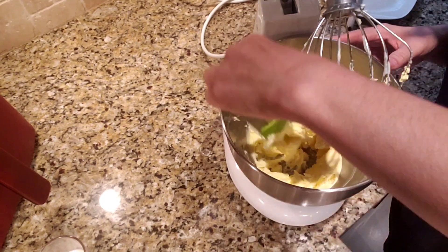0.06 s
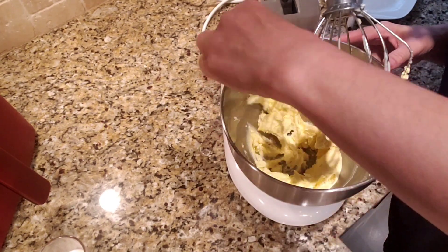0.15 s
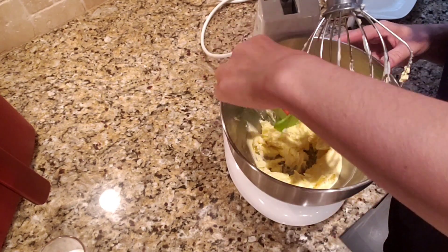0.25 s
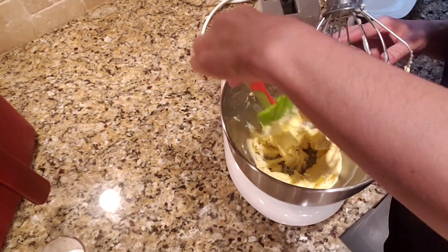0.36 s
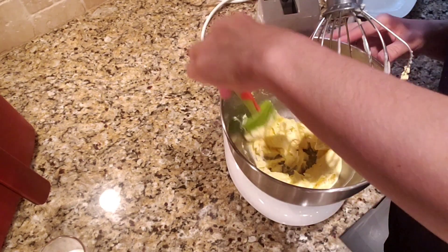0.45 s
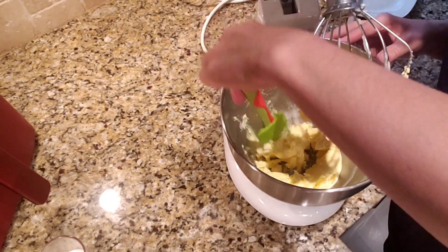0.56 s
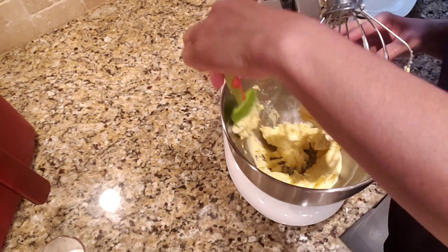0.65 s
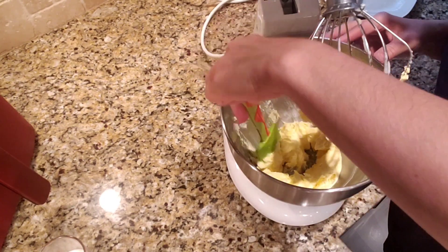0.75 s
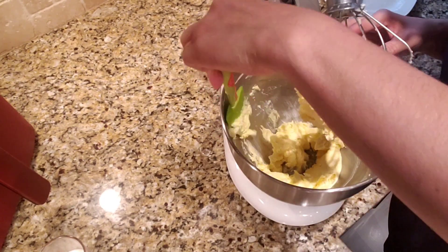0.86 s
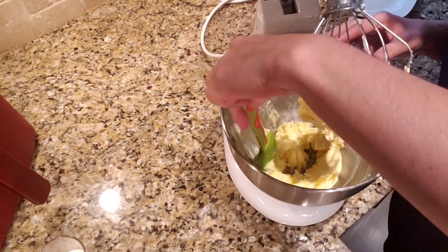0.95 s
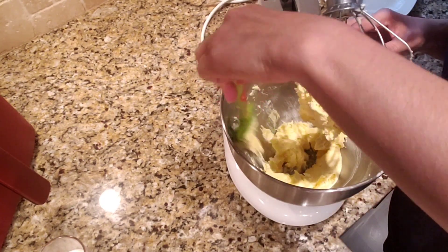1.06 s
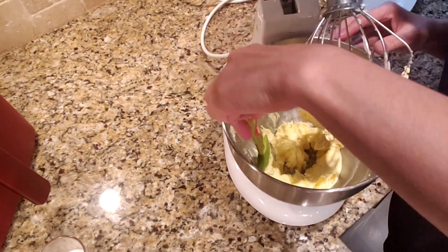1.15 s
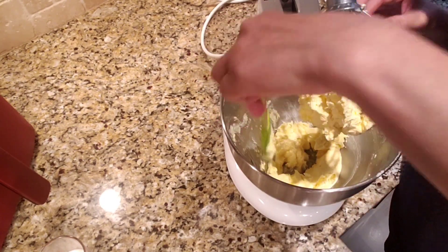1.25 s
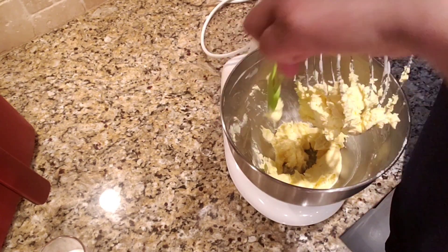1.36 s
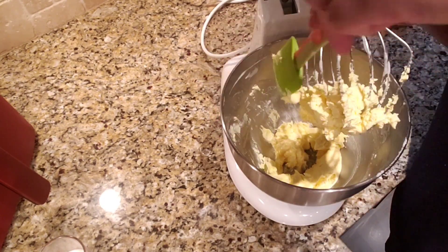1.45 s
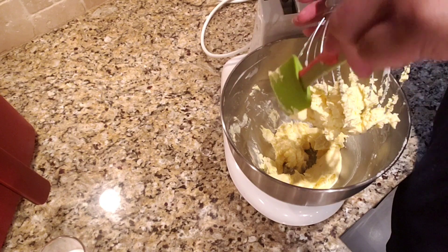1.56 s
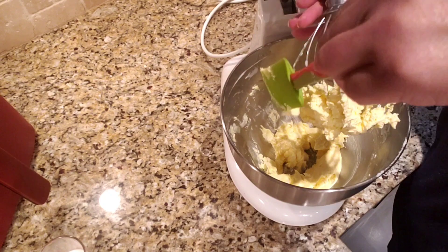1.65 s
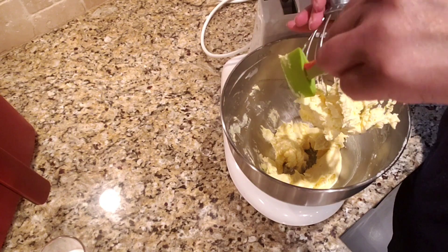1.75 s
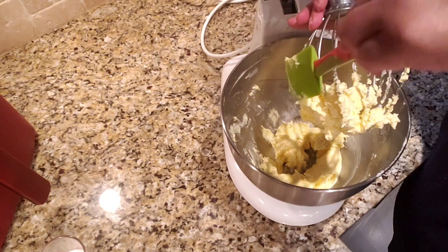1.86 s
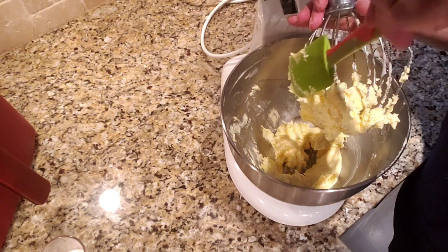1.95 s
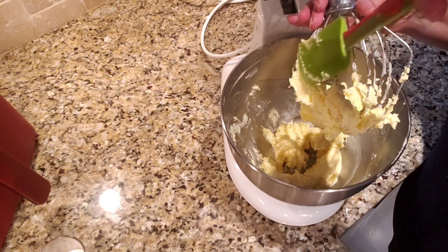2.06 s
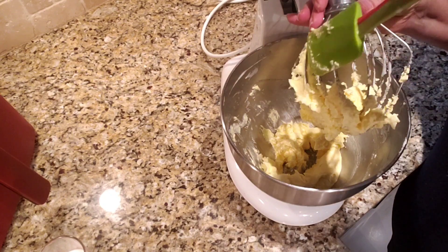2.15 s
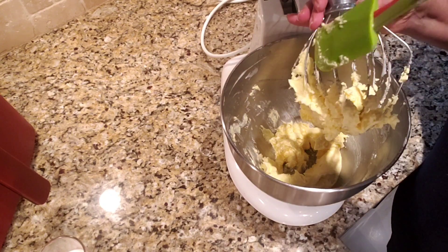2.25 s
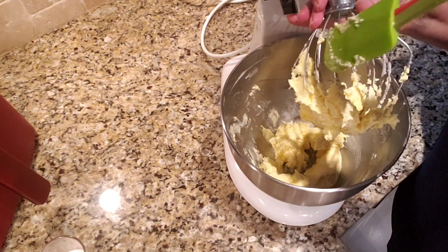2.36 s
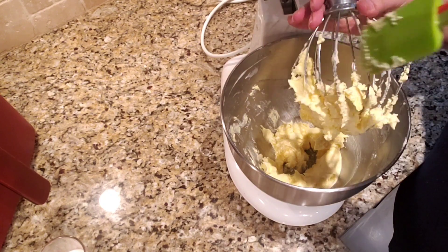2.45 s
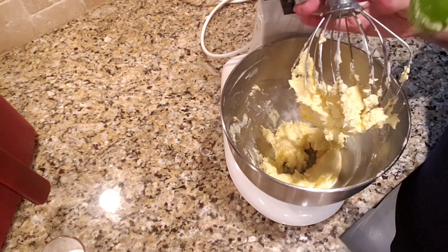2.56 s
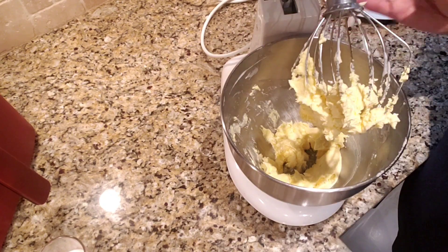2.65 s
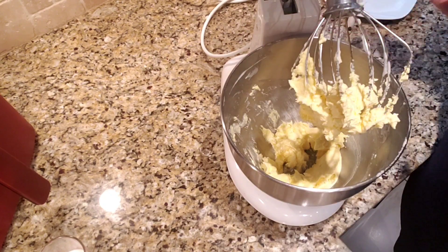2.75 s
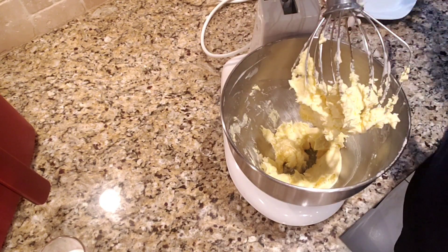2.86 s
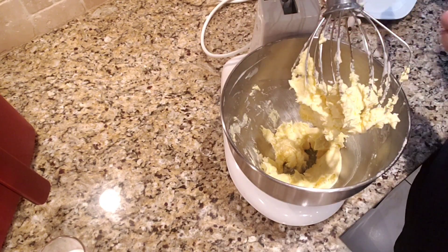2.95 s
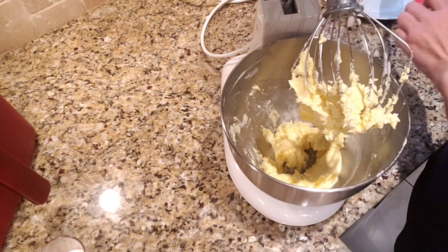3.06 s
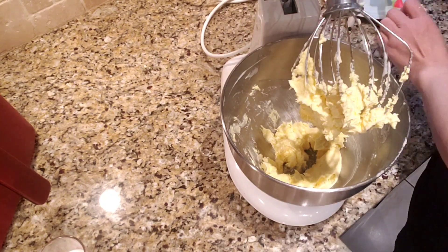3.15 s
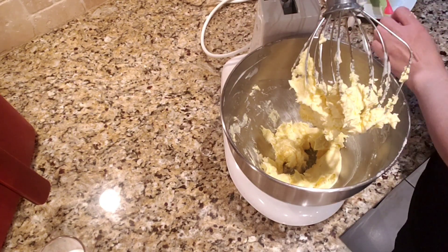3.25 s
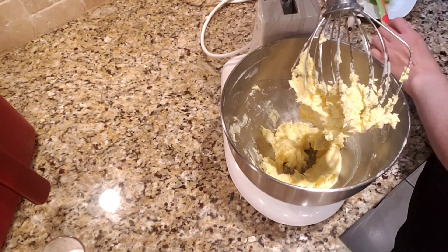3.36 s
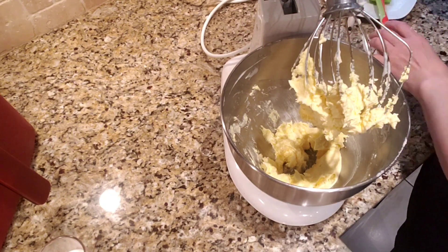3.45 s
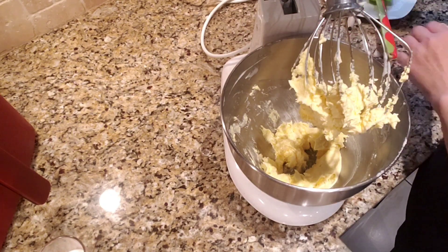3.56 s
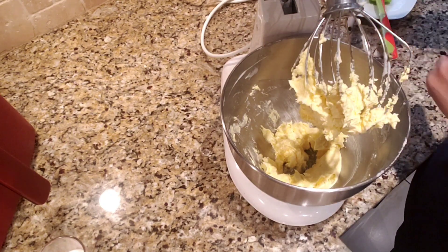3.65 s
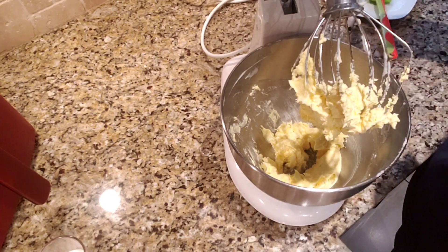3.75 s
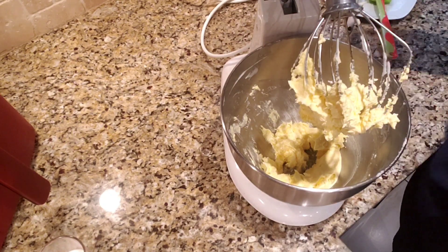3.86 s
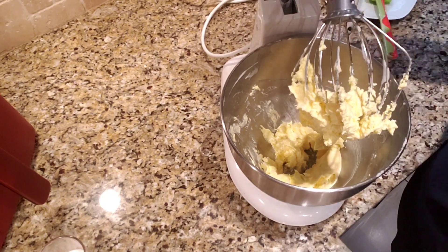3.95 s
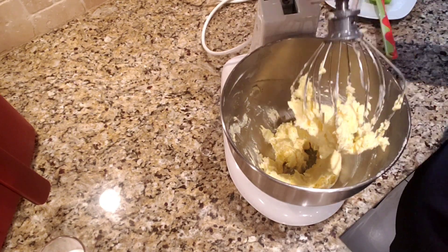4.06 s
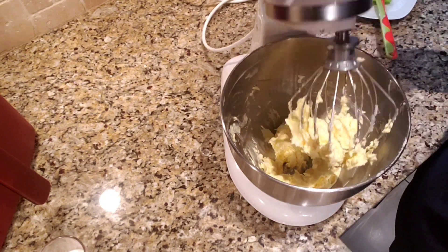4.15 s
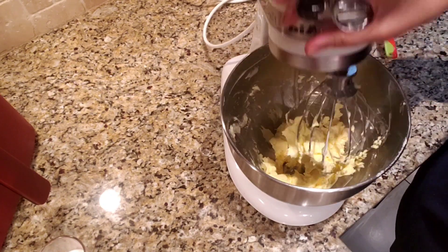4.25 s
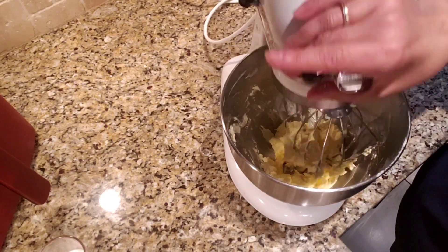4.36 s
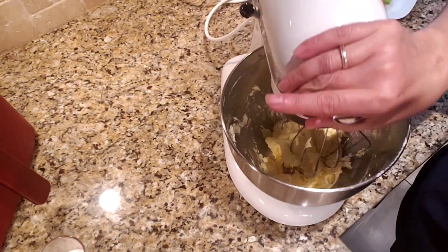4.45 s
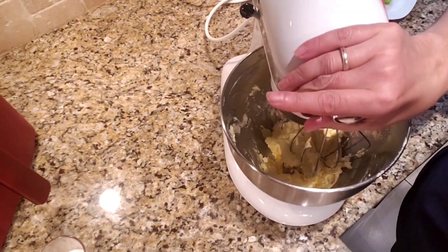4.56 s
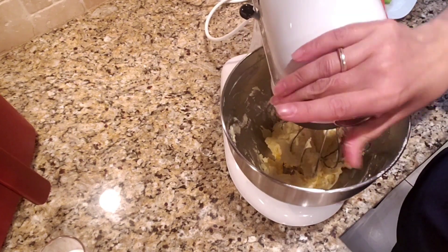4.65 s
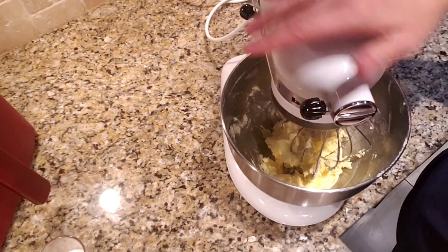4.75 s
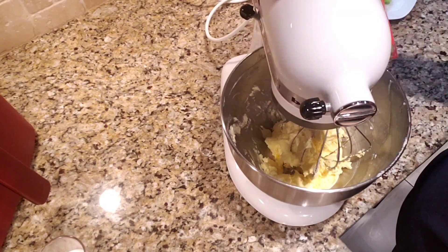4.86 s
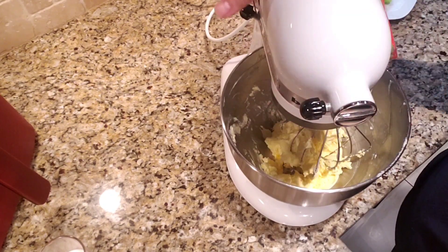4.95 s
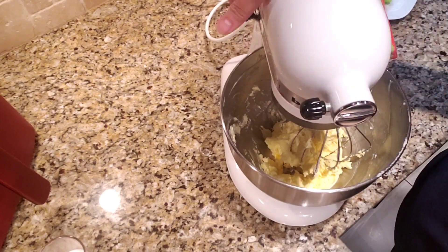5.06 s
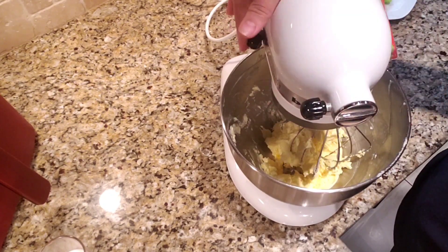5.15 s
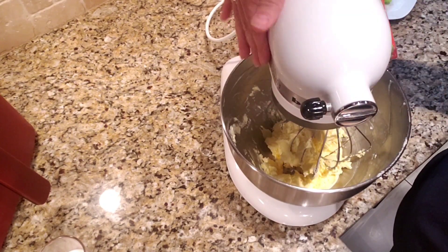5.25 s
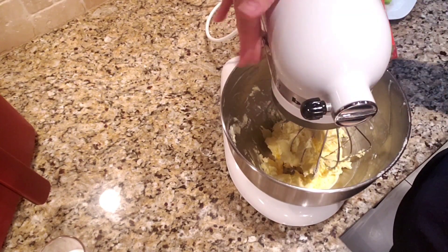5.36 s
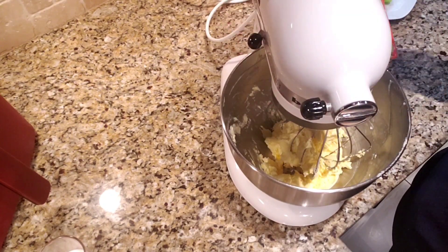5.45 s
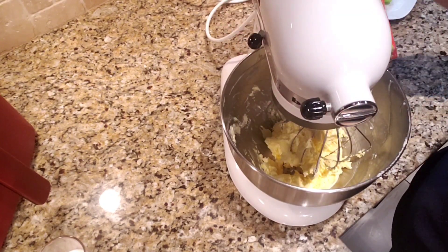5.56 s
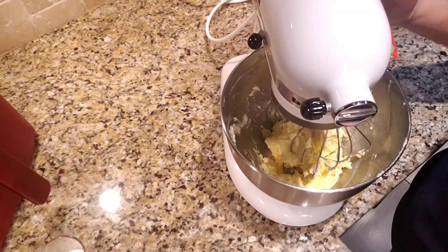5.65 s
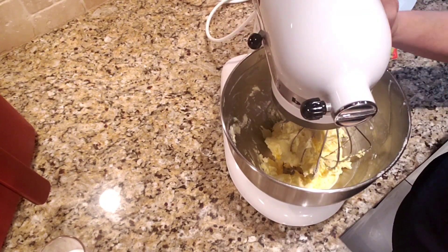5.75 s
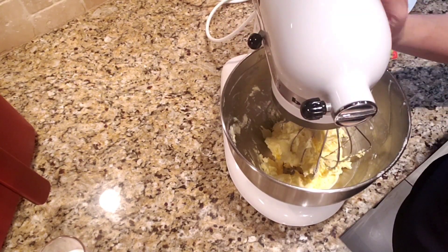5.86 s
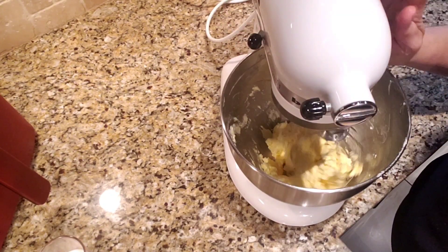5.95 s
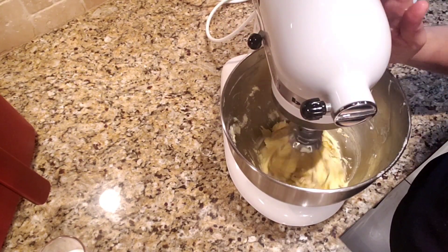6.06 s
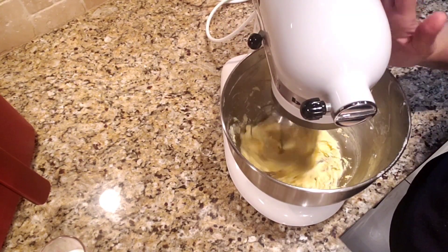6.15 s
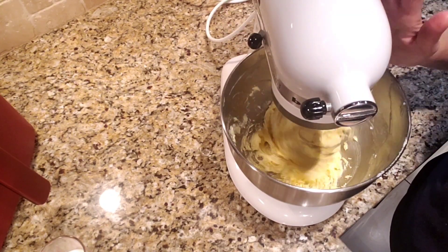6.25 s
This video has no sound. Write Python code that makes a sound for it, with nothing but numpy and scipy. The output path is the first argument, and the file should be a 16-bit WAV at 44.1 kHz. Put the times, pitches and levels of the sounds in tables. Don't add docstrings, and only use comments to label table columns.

```python
import sys
import numpy as np
from scipy import signal
from scipy.fft import rfft, irfft, next_fast_len
from scipy.io import wavfile
from scipy.ndimage import uniform_filter1d

SR = 44100
rng = np.random.default_rng(int(sys.argv[2]) if len(sys.argv) > 2 else 0)


def boost_factor(decibels):
    exponent = np.asarray(decibels, float) / 20
    return 10 ** exponent


def materialize(psi):
    bounded = np.clip(np.atleast_2d(psi).T, -1, 1)
    quanta = np.round(bounded * 32767).astype(np.int16)
    wavfile.write(sys.argv[1], SR, quanta)


N = 277375
EDGE_HZ = 14480


def evened(x):
    return x / np.sqrt(np.mean(x ** 2) + 1e-20)


def read(points, hz):
    f, value = np.transpose(points)
    return np.interp(np.log(hz + 1), np.log(f + 1), value)


def add(mix, s, sound):
    part = mix[..., round(s * SR):][..., :sound.shape[-1]]
    part += sound[..., :part.shape[-1]]


def panned(x, db):
    return x * boost_factor(np.array([[db / 2], [-db / 2]]))


def ports(x):
    # f/Hz, coherence/1
    likeness = [(60, 0.95), (150, 0.97), (380, 0.93), (950, 0.32), (2380, -0.02), (5980, -0.01),
                (15000, 0.02)]
    left, other = rfft(x)
    same = np.clip(read(likeness, np.fft.rfftfreq(x.shape[1], 1 / SR)), 0, 1)
    right = same * left + np.sqrt(1 - same ** 2) * other
    return irfft(np.array([left, right]), x.shape[1])


def noise(colour, lo_hz=0, hi_hz=SR, peaks=(), valley_db=0):
    size = next_fast_len(N)
    hz = np.fft.rfftfreq(size, 1 / SR) + 1
    band = boost_factor(read(colour, hz)) / np.sqrt((1 + (lo_hz / hz) ** 8) * (1 + (hz / hi_hz) ** 8))
    resonances = sum(boost_factor(db) / (1 + (2 * (hz - f) / width) ** 2) for f, width, db in peaks)
    band = band * (boost_factor(valley_db) + resonances)
    white = ports(rng.standard_normal((2, size)))
    return evened(irfft(rfft(white) * band, size)[:, :N])


def wobble(span):
    size = int(span * SR)
    return evened(uniform_filter1d(uniform_filter1d(rng.standard_normal(N), size), size))


def whistle(hz, width):
    carrier = np.exp(2j * np.pi * np.cumsum(hz * np.ones(N)) / SR)
    return evened((carrier * (wobble(0.5 / width) + 1j * wobble(0.29 / width))).real)


def ring(hz, t60, rise, phase=0):
    t = np.arange(int(max(t60, .01) * SR)) / SR
    envelope = boost_factor(-60 * t / max(t60, .01)) * (1 - np.exp(-t / rise))
    return envelope * np.sin(2 * np.pi * hz * t + phase)


def cluster(modes, spread):
    out = np.zeros((2, N))
    for (s, db, hz, t60), chance in zip(modes, rng.random((len(modes), 3, 3))):
        for k, (shift, *phase) in enumerate(chance):
            f = hz + spread * min(hz, 4000) * (k - 1) * (.5 + shift)
            phases = 2 * np.pi * np.array(phase)[:, None]
            add(out, s, boost_factor(db - 1.6 * abs(k - 1)) * ring(f, t60, 0.00027, phases))
    return out


def thuds():
    # t/s, bowl peak level/dB, counter level/dB, stand level/dB, bowl overtone level/dB
    landings = [(1.062, -41, -60, -44, -2), (1.275, -49.5, -52, -49, -1), (4.056, -35, -50, -43, 7),
                (4.07, -31, -45, -36, -9), (4.132, -36, -40.5, -43, -11), (4.198, -51, -44, -45, 14.5),
                (4.536, -30.5, -39, -40.5, -3), (4.688, -15, -15.5, -20.5, 3), (4.718, -33.5, -24, -26, 12),
                (4.75, -38, -33, -54, -10), (4.798, -7.5, -14.5, -18, -0.5), (4.835, -38.5, -31.5, -26, -2),
                (4.917, -71, -32.5, -47, -17), (5.052, -37, -49.5, -46, -19),
                (5.339, -28.5, -44.5, -51, 3.5), (5.39, -34.5, -41, -46.5, 9), (6.069, -31.5, -51, -54, -7),
                (6.096, -31, -40, -37, 0), (6.127, -44, -39, -44, -6), (6.169, -48, -52, -41, -3)]
    # f/Hz, level/dB, t60/s
    bowl = [(357.1, 0.5, 0.17), (383, -4, 0.12), (467, -6, 0.11), (520, 0, 0.058), (660, -9.5, 0.067),
            (780, -12.5, 0.015)]
    # t/s, peak level/dB, f/Hz, length/s
    nudges = [
        (1.971, -40, 369, 0.032),
        (4.352, -26.5, 370, 0.028),
        (4.398, -52, 361, 0.031),
        (4.437, -34, 364, 0.034),
    ]
    counter_hz, counter_t60, counter_phase = 47, 0.16, 3.6
    stand_hz, stand_t60, stand_phase = 95.6, 0.12, 3.61
    out, deep = np.zeros((2, N))
    for row, tilt in zip(landings, rng.standard_normal((len(landings), len(bowl)))):
        s, db, counter_db, stand_db, over_db = row
        hold = 0.8 * boost_factor(-0.12 * (max(db, stand_db) + 34.5))
        for k, ((hz, mode_db, t60), chance) in enumerate(zip(bowl, tilt)):
            level = db + mode_db - 1.5 + 0.8 * chance + over_db * (k > 1)
            add(out, s, boost_factor(level) * ring(hz, t60 * hold, 0.0065))
        counter = ring(counter_hz, counter_t60 * hold, 0.0041, counter_phase)
        add(deep, s + 0.01, boost_factor(counter_db + 2.5) * counter)
        add(deep, s, boost_factor(stand_db + 8.0) * ring(stand_hz, stand_t60 * hold, 0.002, stand_phase))
    for s, db, hz, length in nudges:
        t = np.arange(int(length * SR)) / SR
        swell = np.sin(np.pi * t / length) ** 0.5
        add(out, s - .004, boost_factor(db - 3.5) * swell * np.sin(2 * np.pi * hz * t))
    return panned(out, 2.7) + panned(deep, 1.0)


def clicks():
    # t/s, peak level/dB, low level re peak/dB, bright level re peak/dB, t60/s
    rim = [
        (0.2267, -58, 11, 12.5, 0.065),
        (0.3665, -60, 10, 10, 0.092),
        (0.6183, -46.5, -33, 6.5, 0.4),
        (1.0603, -48, -8, 18, 0.33),
        (1.276, -49.5, 2, 16.5, 0.28),
        (3.5839, -22.5, -16, -22, 0.42),
    ]
    lever = [
        (4.6345, -48, 5, -3, 0.26),
        (4.6656, -37, 7, 7, 0.11),
        (5.0505, -34, -18, -1, 0.37),
        (5.255, -48.5, -27.5, -15.5, 0.16),
        (5.2885, -41, -32, -18, 0.17),
        (5.3088, -26, -26.5, 3.5, 0.25),
        (5.3454, -23.5, -28, -8.5, 0.22),
        (5.389, -33, -21, -3, 0.083),
        (5.4283, -44, -13, 13.5, 0.04),
        (5.4694, -44.5, -11, -11, 0.095),
    ]
    latch = [
        (3.9915, -47.5, 2, 22.6, 0.025),
    ]
    snap = [
        (5.0508, -41.5, -32, 17.5, 0.014),
        (5.3418, -20.5, -5, 5.7, 0.022),
        (6.0639, -28, -1.5, 4.3, 0.042),
    ]
    hinge = [(3.9957, -38.5, -15, 6), (4.0454, -39, 4, -29), (4.0622, -44, -5, -27), (4.185, -42, 0, -14),
             (4.211, -47.5, -17, -9), (4.359, -69, 17, -18), (4.533, -55.5, 22.5, -1.5),
             (4.686, -44.5, 5, -7), (4.704, -37.5, -16, 1), (4.7298, -33.5, -23, -7),
             (4.799, -44.5, 10, -16), (4.8107, -39, -7, -1)]
    gears = [
        (6.0661, -18, -16, 8),
        (6.084, -21.5, -9, 10.5),
        (6.1034, -17, -21, 5.5),
        (6.123, -20.5, -7, 6),
        (6.155, -25, -4, -10),
        (6.175, -26, -4, -7),
    ]
    # f/Hz, level/dB
    metal = [(290, -34), (500, 1.5), (632, 2.5), (760, -6.5), (892, -6), (1100, -5.5), (2060, -12),
             (2810, -15), (3380, -11.5), (5010, -6), (7160, 3.5), (9500, -10), (12400, -46.5),
             (20900, -120)]
    sheen = [(8000, -15), (9500, -9.5), (11500, -5), (13000, -5.5), (14000, -2.5), (15000, -11.5)]
    hinge_t60, gears_t60, crack_t60 = 0.11, 0.068, 0.0046
    # rows, top level/dB, crack level/dB, pan/dB
    groups = [(rim, -16, -3, 3.1),
              ([(*row, hinge_t60) for row in hinge], -4, -3, 1.5),
              (lever, .6, -3, 3.6),
              (latch, -18, 6, 1.5),
              (snap, 4, 6, 3.8),
              ([(*row, gears_t60) for row in gears], -1.2, -3, 2.5)]
    low, mid = noise(metal, 550, 1800), noise(metal, 1960, 3360)
    high, top = noise(metal, 3800, 9000), noise(sheen, 7600)
    out, t = np.zeros((2, N)), np.arange(SR // 3) / SR
    rattle = boost_factor(2.2 * wobble(.001))
    for rows, top_db, crack_db, pan_db in groups:
        for s, db, low_db, high_db, t60 in rows:
            at = slice(round(s * SR), round(s * SR) + len(t))
            u = t[:low[:, at].shape[1]]
            fall = boost_factor(-60 * u / max(t60, .01)) * rattle[at] * (1 - np.exp(-u / .0003))
            crack = boost_factor(crack_db - 60 * u / crack_t60)
            bright = mid[:, at] + boost_factor(high_db) * (high[:, at] + boost_factor(top_db) * top[:, at])
            sound = bright * (fall + crack) + boost_factor(low_db) * low[:, at] * fall ** 0.53
            add(out, s, panned(boost_factor(db - 9.5) * sound, pan_db))
    return out


def loose_metal():
    # t/s,
    # level/dB, f/Hz, t60/s
    ringing = [(.228, -48, 1150, 0.019), (.364, -59, 1800, 0.39), (.364, -57.5, 2450, 0.25),
               (1.277, -47.5, 1800, 0.049), (3.992, -38, 6900, 0.047), (3.992, -46, 3270, 0.11),
               (4.063, -44.5, 1850, 0.15), (4.186, -49, 3210, 0.052), (4.189, -39, 1840, 0.039),
               (4.636, -57, 6000, .1), (4.665, -42, 1270, 0.052), (4.672, -35.5, 4160, 0.045),
               (4.796, -32, 1480, 0.035), (4.8, -26.5, 855, 0.032), (4.794, -35, 1080, .02),
               (4.686, -32.5, 930, 0.053), (5.05, -42, 3880, .22), (5.054, -35.5, 3964, 0.13),
               (5.05, -36, 11300, 0.1), (5.312, -33, 7660, 0.02), (5.3415, -12, 13600, 0.018),
               (5.3415, -26, 6880, 0.018),
               (6.0655, -15.5, 13560, 0.04), (6.066, -27, 3500, 0.32), (6.068, -32.5, 2100, 0.27),
              (6.1, -22, 3440, 0.032), (6.181, -20.5, 1910, .03), (6.157, -30, 1800, 0.037),
              (6.138, -31, 1480, 0.033), (6.196, -31.5, 810, .04), (6.066, -31, 3410, 0.026),
               (3.997, -45, 2690, 0.063), (3.997, -46, 3760, .04), (3.998, -50, 4330, .04),
               (4.06, -46, 2200, .08), (4.066, -45.5, 1526, .08), (4.07, -45, 3200, .06),
               (4.048, -40, 766, .05), (4.184, -47, 1300, .04), (4.195, -51, 2354, .07),
               (4.2, -49.5, 1617, 0.11), (4.668, -49, 2330, 0.034), (4.686, -38, 1400, .04),
               (4.735, -43, 940, .04), (4.74, -47, 2590, .04), (4.815, -51.5, 2154, .08),
               (4.885, -51, 1800, 0.038), (5.316, -41, 1400, 0.017), (5.35, -32, 1900, .03),
               (5.385, -35, 1890, .03), (2.02, -62, 700, .03), (2.615, -62, 700, .03),
               (4.35, -53, 800, 0.036)]
    return panned(cluster(ringing, spread=0.041), 1.1)


def lever_slide():
    s, length, db = 5.3085, .0165, -32
    hz, width = 7600, 900
    out = np.zeros((2, N))
    rasp = noise([(100, 0), (20000, 0.003)], 1200, peaks=[(hz, width, 0)], valley_db=-13.5)
    add(out, s, boost_factor(db) * rasp[:, :int(length * SR)])
    return panned(out, 4.8)


def motor():
    # t/s, shaft f/Hz, unbalance level/dB
    run_up = [
        (6.066, 92.2, -58),
        (6.11, 87, -35),
        (6.19, 94, -51),
        (6.2, 96.6, -32),
        (6.25, 104, -17),
        (6.29, 106, -29),
    ]
    # f/Hz, level/dB
    running = [(88, -43), (150, 3.5), (200, -26), (247, -28), (271, -44), (355, 0), (520, -12.5),
               (839, -10), (1160, -15), (2140, -10), (2310, -10), (5260, -14), (7010, -6.5), (8490, -20.5),
               (14500, -11)]
    t, (s, hz, swing_db) = np.arange(N) / SR, np.transpose(run_up)
    run = np.maximum(t - s[0], 0)
    on = np.clip((t - s[0]) / 0.0046, 0, 1)
    turns = 2 * np.pi * np.cumsum(np.interp(t, s, hz)) / SR
    swing = boost_factor(np.interp(t, s, swing_db) - 11) * (np.sin(turns) + 0.027 * np.sin(2 * turns))
    surge_at, surge_length = 0.051, 0.041
    hiss_db = -29.5 + 8 * np.exp(-((run - surge_at) / surge_length) ** 2)
    brushes = boost_factor(hiss_db + 0.67 * np.sin(turns) + 1.7 * wobble(0.0035)) * noise(running, 216)
    mesh_hz = 560 + 13200 * run * (1 - 0.92 * run)
    casing_hz, casing_width, casing_db = 1880, 450, 19
    upper_db = -44 + casing_db / (1 + (2 * (mesh_hz - casing_hz) / casing_width) ** 2)
    upper = boost_factor(upper_db) * np.array([whistle(mesh_hz, 50) for _ in "lr"])
    lower = boost_factor(-46 + 27 * run) * whistle(.4 * mesh_hz, 45)
    teeth = boost_factor(2 * wobble(.006) - 4)
    return panned(on * (swing + brushes + teeth * (upper + lower)), 1.8)


def contacts(rows, release_db_per_s, touch_db, lift_db, rest_db):
    press, drag, t = np.zeros(N), np.zeros(N), np.arange(N) / SR
    swell_db, let_go = 12.5, 0.1
    for s, swell, hold, db, change_db in rows:
        at = s + np.cumsum([0, swell, hold, let_go])
        level = np.interp(t, at[:3], [db - swell_db, db, db + change_db])
        level = level - release_db_per_s * np.maximum(t - at[2], 0)
        on = uniform_filter1d(1. * (t > s), 130) * boost_factor(level)
        press += on
        drag_at = [at[1], at[2] - hold / 4, at[2], at[3]]
        drag += on * boost_factor(np.interp(t, drag_at, [touch_db, touch_db + 9.5, lift_db, rest_db]))
    return np.array([press, drag])


def wandering(x, depth_db, frames, bins):
    z = signal.stft(x, nperseg=512)[2]
    chance = rng.standard_normal(z.shape[1:])
    field = evened(uniform_filter1d(uniform_filter1d(chance, bins, 0), frames, 1))
    return evened(signal.istft(z * boost_factor(depth_db * np.clip(field, -3, 1)), nperseg=512)[1][:, :N])


def spatula():
    # t/s, swell/s, hold/s, pressure level/dB, change over the hold/dB
    strokes = [
        (0.0, 0.084, 0.08, -48.5, -2.5),
        (.352, 0.02, 0.095, -33, -8.5),
        (.615, 0.0037, 0.069, -48, 5),
        (.853, 0.0044, 0.081, -45, -3),
        (1.058, 0.0023, 0.087, -44.5, -2),
        (1.274, 0.0072, 0.061, -49.5, 1.5),
    ]
    # t/s, swell/s, hold/s, pressure level/dB
    rustles = [
        (2.165, .02, .02, -73),
        (2.82, 0.022, 0.14, -72.5),
        (3.116, 0.057, 0.11, -65.5),
        (3.475, .02, 0.039, -69),
        (3.743, 0.074, 0.17, -59),
        (4.842, 0.026, 0.039, -58.5),
        (5.544, 0.021, .1, -60),
        (5.847, 0.082, 0.059, -69.5),
    ]
    # f/Hz, level/dB
    rubber = [(1760, -47), (3000, -30.5), (3250, -6), (3420, -31), (4010, -10.5), (5650, 1), (6150, -0.5),
              (6840, 3.5), (9570, -6.5), (12700, 1.5), (14500, 0.5)]
    dull = [(500, -2.5), (800, -5.5), (2500, -1), (4500, -3.5), (6000, -38)]
    # f/Hz, width/Hz, level/dB
    bowl_wall = [(915, 35, 3), (1220, 61, 7), (1800, 55, 1.5), (2450, 245, -5), (2940, 82, -6.5),
                 (3500, 40, -4.5), (4200, 29, -4), (4130, 1200, -2.5), (4575, 280, 0)]
    hand_sag_db = -3.5
    by_blade = contacts(strokes, 290, -26.5, -8, -18.5)
    by_skin = contacts([(*row, hand_sag_db) for row in rustles], 149.5, -17.5, -14.5, -11.5)
    press, drag = by_blade + by_skin
    slips = boost_factor(0.37 * wobble(0.00029) + 1.3 * wobble(0.012) + 4.0)
    wall = wandering(noise(dull, 700, 4600, bowl_wall, valley_db=-9), depth_db=10, frames=12, bins=2)
    blade = wandering(noise(rubber, 3600), depth_db=4, frames=9, bins=3)
    return panned(slips * (press * blade + drag * wall), 1.3)


def plate():
    # t/s, peak level/dB
    blow = [
        (3.5838, -17.5),
    ]
    # f/Hz, level/dB, t60/s
    ceramic = [(722, -2.5, .07), (1850, -8, .2), (2110, -7, 0.46), (2210, -6.5, 0.41), (3275, -4.5, .42),
               (3620, 2, 0.2), (3860, -8.5, 0.29), (1215, -3, 0.09), (4330, 3.5, .15), (5635, 4.5, 0.31),
               (5770, 2.5, 0.07), (6300, -17.5, 0.16), (6831, -12.5, 0.22), (7700, -12.5, 0.15),
               (8280, -17.5, .2), (9880, -18.5, 0.3), (10730, -24.5, 0.3), (11700, -16, 0.17),
               (12620, -26, 0.25), (13100, -24.5, .28), (13510, -18, .24), (2286, -8, 0.26),
               (2070, -10.5, 0.26)]
    s, db = blow[0]
    return panned(cluster([(s, db + mode_db - 14.5, hz, t60) for hz, mode_db, t60 in ceramic], spread=0.00806), 1.7)


def squeak():
    s, length, db = 2.995, .125, -66
    from_hz, to_hz = 10600, 12400
    u, out = np.linspace(0, 1, int(length * SR)), np.zeros((2, N))
    hz = from_hz + (to_hz - from_hz) * np.sin(np.pi * u ** 1.2)
    fuzz = uniform_filter1d(rng.standard_normal((2, N)), 24)[:, :len(u)]
    tone = np.sin(2 * np.pi * np.cumsum(hz) / SR)
    add(out, s, boost_factor(db) * np.sin(np.pi * u) * evened(fuzz) * tone)
    return out


def kitchen(x):
    # f/Hz, t60/s
    decay = [(100, 0.34), (400, 0.42), (2000, 0.5), (6000, 0.43), (14000, 0.35)]
    taps = np.zeros((2, SR // 2))
    slots = np.arange(180, SR // 2 - 20, 20)
    at = slots[None] + rng.integers(0, 20, (2, len(slots)))
    np.put_along_axis(taps, at, rng.choice([-1., 1.], at.shape), 1)
    hz, t, z = signal.stft(ports(taps), SR, nperseg=256)
    tail = signal.istft(z * boost_factor(-60 * t / read(decay, hz)[:, None]), SR, nperseg=256)[1]
    return signal.fftconvolve(x, tail / np.linalg.norm(tail[0]), axes=1)[:, :N]


def fridge():
    # f/Hz, level/dB, width/Hz
    tones = [(120.8, -51, .5), (241.2, -54.5, 1.6), (59, -68.5, 15), (338.5, -63, 11), (215.4, -68, 2.7)]
    # f/Hz, level/dB
    rumbling = [(15, -62), (25, -11), (69, -6.5), (95, -7), (119, -8.5), (144, -17), (173, -17), (217, -15),
                (241, -4.5), (288, -19.5), (345, -10), (401, -16.5), (637, -21), (708, -35), (900, -45),
                (1170, -74), (1980, -120)]
    hissing = [(410, -17.5), (700, -5.5), (961, -11), (1110, -10), (1660, -15.5), (1790, -16),
               (3500, -17.5), (3780, -15.5), (4810, -21.5), (6780, -11), (8730, -28), (13800, -10.5),
               (14500, -12.5)]
    t, out = np.arange(N) / SR, np.zeros(N)
    for hz, db, width in tones:
        phase = 2 * np.pi * hz * t + width * 0.15 * wobble(0.059)
        steady = np.sqrt(2) * np.sin(phase) * boost_factor(width * wobble(0.0059))
        out += boost_factor(db) * (steady if width < 5 else whistle(hz, width))
    rumble = boost_factor(-54) * noise(rumbling, 30, 1200)
    hiss = boost_factor(-71.5 + 0.37 * wobble(.07)) * noise(hissing, 480)
    return panned(out + rumble, 1.0) + panned(hiss, 1.1)


def scene():
    low = thuds()
    hits = plate() + clicks()
    rings = loose_metal()
    rub = spatula() + squeak() + motor() + lever_slide()
    sent = boost_factor(-9.5) * rings + boost_factor(-6) * hits + boost_factor(-4.5) * low + boost_factor(-9.5) * rub
    return hits + low + rub + rings + kitchen(sent) + fridge()


def thinned(x):
    threshold_db, depth_db, from_hz = -21, -22, 750
    split_hz, under_treble_db = 4800, -16.5
    hz, _, z = signal.stft(x, SR, nperseg=2048)
    power = uniform_filter1d((abs(z) ** 2).mean(0), size=5, axis=0)
    power = power * ((hz > from_hz) & (hz < EDGE_HZ))[:, None]
    treble = power[(hz > split_hz) & (hz < EDGE_HZ)].mean(0)
    treble = boost_factor(2 * under_treble_db) * treble * (hz < split_hz)[:, None]
    weak = (power > 0) & (power < np.maximum(boost_factor(2 * threshold_db) * power.mean(0), treble))
    return signal.istft(z * boost_factor(depth_db * weak), nperseg=2048)[1][:, :N]


def band_limit(x):
    return signal.sosfilt(signal.butter(12, 15950, fs=SR, output="sos"), x)


def record(dry):
    edge = signal.firwin(511, EDGE_HZ, window=("kaiser", 9), fs=SR)
    cut = signal.sosfilt(signal.butter(5, 40, "high", fs=SR, output="sos"), dry)
    mix = thinned(signal.oaconvolve(cut, edge[None], "same"))
    return band_limit(mix)


dry = scene()
out = record(dry)
materialize(out)
```